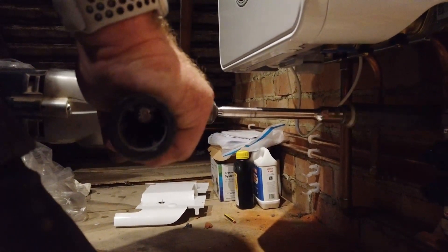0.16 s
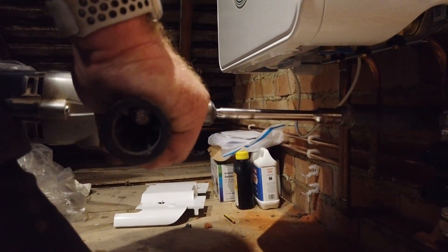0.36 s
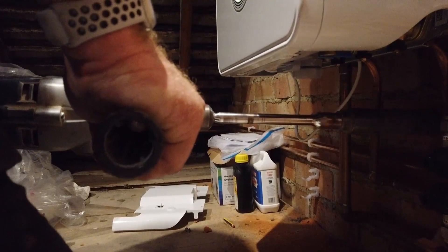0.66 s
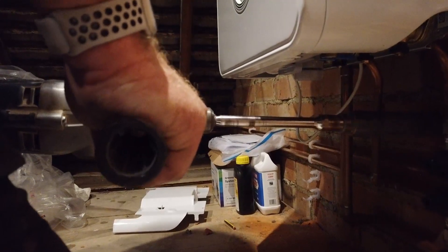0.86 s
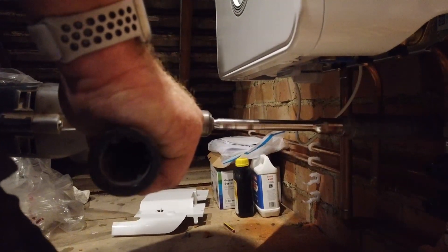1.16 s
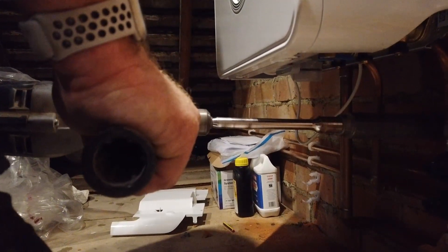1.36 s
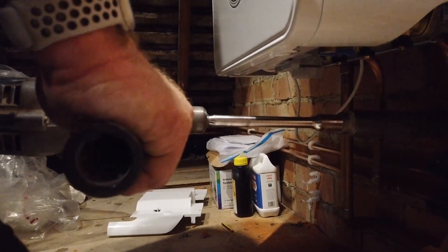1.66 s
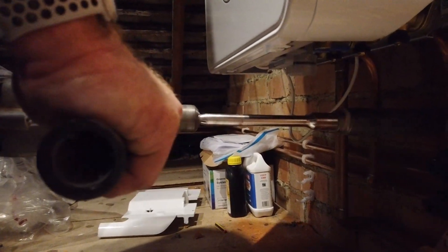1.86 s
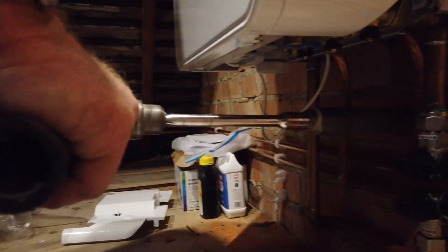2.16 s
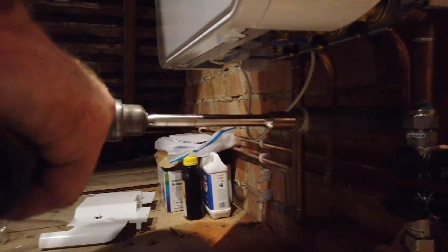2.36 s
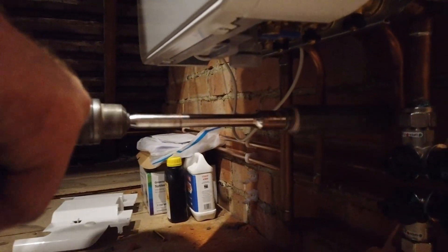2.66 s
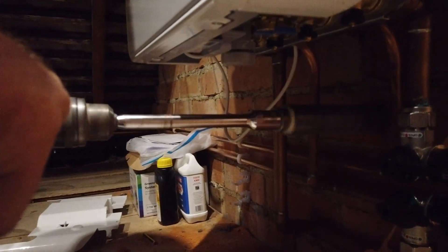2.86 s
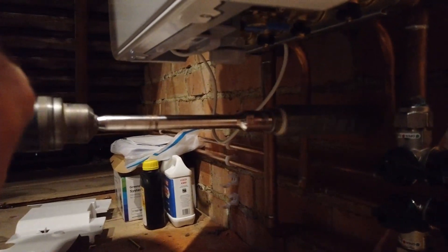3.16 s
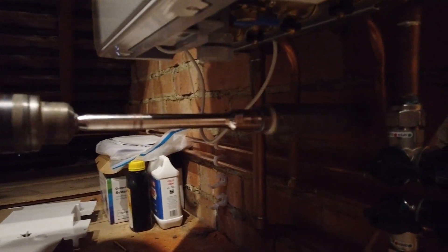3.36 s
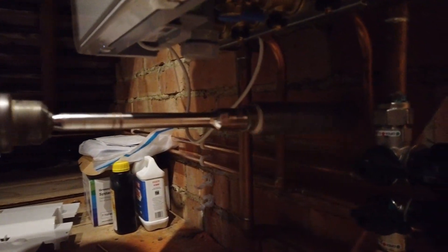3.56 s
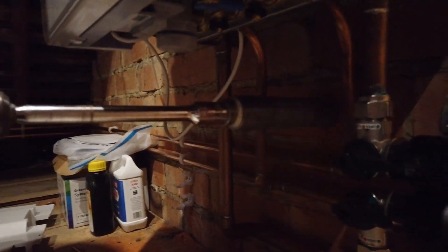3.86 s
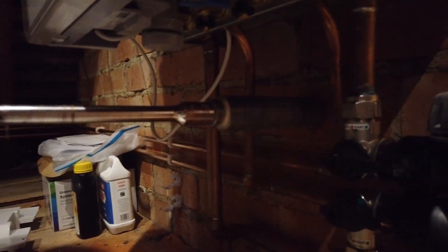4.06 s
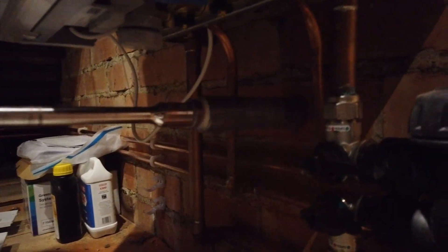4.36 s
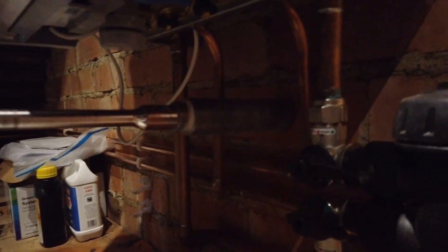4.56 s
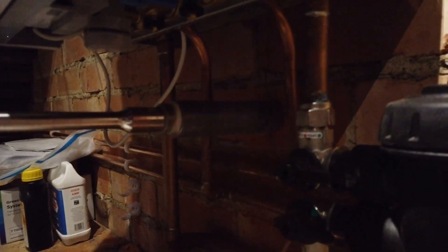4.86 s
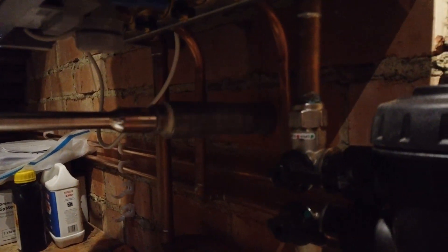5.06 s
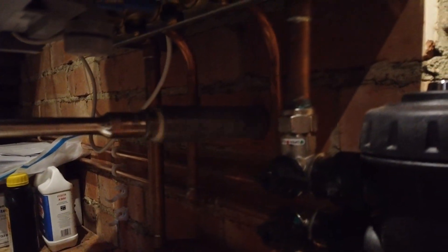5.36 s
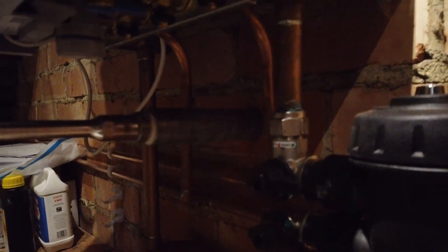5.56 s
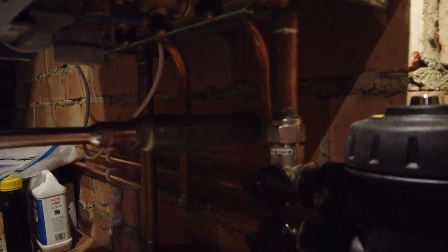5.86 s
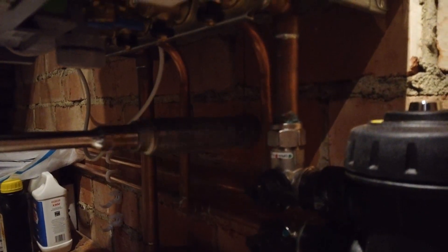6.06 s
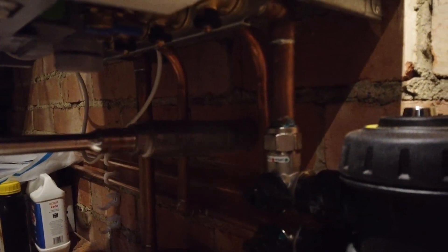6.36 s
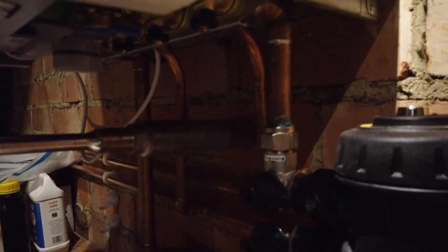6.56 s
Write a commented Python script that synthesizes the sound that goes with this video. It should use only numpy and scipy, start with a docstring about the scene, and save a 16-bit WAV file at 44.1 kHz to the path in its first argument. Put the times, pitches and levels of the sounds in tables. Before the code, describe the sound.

An electric drill starts up close by with a jolt, a short rattle of gears and a rising whine, reaching full speed at about 1 second. From then on the motor hums and whines over a high hiss of air. Throughout, its steel core bit grinds into brick with a gritty rasp. For the first 3 seconds it knocks dully and scrapes about ten times a second, with a few faint squeaks. Around 2.5 seconds a high metallic squeal creeps in, turning loud by 3 seconds and throbbing with each turn of the bit. The knocking fades and the motor sags slightly. The squeal stutters, with sharper chirps near 5 seconds, drops back from about 5.4 to 5.9 seconds as the motor recovers, then returns loudly until about 6.6 seconds, just before the end. The cramped loft adds only short, dull echoes.

```python
"""A rising whine and a rattle of gears: an electric drill runs up in a cramped loft.
Its steel core bit grinds into a brick wall, knocking and scraping in the hole once a turn,
over the hum of the rotor and a rush of cooling air. As it bites deeper, stick-slip friction
sets the tube squealing in throbs and the motor sags under the load."""
import sys
import numpy as np
from scipy import signal
from scipy.fft import rfft, irfft, next_fast_len
from scipy.io import wavfile

SR = 44100
rng = np.random.default_rng(int(sys.argv[2]) if len(sys.argv) > 2 else 0)


def wav_record(signal):
    """Record a signal, one row per channel, as 16-bit PCM in the file named by sys.argv[1]."""
    frames = np.transpose(np.atleast_2d(signal))
    bounded = np.clip(frames, -1, 1)
    # unit amplitude maps onto the largest positive 16-bit level
    quanta = np.round(bounded * 32767).astype(np.int16)
    wavfile.write(sys.argv[1], SR, quanta)


N = 295911
GEAR_RATIO = 40.4   # motor turns per bit turn


def from_db(db):
    """Decibels to gain."""
    return 10 ** (np.asarray(db) / 20)


def unit_rms(x):
    """Scale to rms 1."""
    return x / np.sqrt(np.mean(x ** 2) + 1e-20)


def clock():
    """Time of each sample, s."""
    return np.arange(N) / SR


def at_times(rows, times):
    """Each column of a curve at the given times."""
    knots_s, *columns = np.transpose(rows)
    return [np.interp(times, knots_s, column) for column in columns]


def in_time(rows):
    """Each column of a curve at every sample."""
    return at_times(rows, clock())


def at_hz(rows, hz):
    """Read a spectrum on a log-frequency axis."""
    knots_hz, values = np.transpose(rows)
    return np.interp(np.log(hz), np.log(knots_hz), values)


def phase_of(hz):
    """Running angle of a changing frequency, rad."""
    return 2 * np.pi * np.cumsum(hz) / SR


def once_a_turn(motor_hz, place):
    """Times at which the bit passes a given place in its turn."""
    turns = np.maximum.accumulate(np.cumsum(motor_hz / GEAR_RATIO) / SR - place)
    return np.interp(np.arange(np.ceil(turns[0]), turns[-1]), turns, clock())


def drift(rate_hz):
    """Low-passed random wander, rms 1."""
    hop, settle = 40, 2000
    pole = np.exp(-2 * np.pi * hop * rate_hz / SR)
    white = rng.standard_normal(N // hop + settle + 2)
    slow = signal.lfilter([1], [1, -2 * pole, pole * pole], white)[settle:]
    return np.interp(np.arange(N) / hop, np.arange(len(slow)), unit_rms(slow))


def resonate(x, hz, width_hz):
    """Two-pole resonance, peak gain 1."""
    radius = np.exp(-np.pi * width_hz / SR)
    feedback = [1, -2 * radius * np.cos(2 * np.pi * hz / SR), radius ** 2]
    return signal.lfilter(np.array([1, 0, -1]) * (1 - radius ** 2) / 2, feedback, x + 1e-18)


def spread(pair, correlation):
    """Mix two independent signals to left and right with a given correlation."""
    correlation = np.clip(correlation, -1, 1)
    return np.sqrt(1 + correlation) * pair[0] + np.sqrt(1 - correlation) * pair[1] * [[1], [-1]]


def tone(angle, waver_db, waver_hz, stray_rad):
    """A partial whose level wavers and whose phase strays between the ears; rms 1."""
    apart = stray_rad * drift(0.72) * np.array([[1], [-1]])
    return unit_rms(np.sin(angle + apart) * from_db(waver_db * drift(waver_hz)))


def grit_ring(hz, width_hz, correlation, grain_db=1.5, per_s=3000):
    """Brick grains of uneven size strike one resonance; rms 1."""
    strikes = rng.random((2, N)) < per_s / SR
    grains = strikes * rng.standard_normal((2, N)) * from_db(grain_db * drift(63))
    ringing = resonate(resonate(grains, hz, width_hz), hz, 5 * width_hz)
    return unit_rms(spread(ringing, correlation))


# stereo image of the noise: f/Hz, left-right correlation
NOISE_CORRELATION = [(30, 0.27), (70, 0.55), (170, 0.56), (350, 0.88), (600, 0.93), (1200, 1), (2200, 0.41),
                     (4000, 0.45), (8000, 0.48), (14000, 0.39)]


def banded_noise(spectrum, flicker_db, flicker_hz):
    """Half-octave bands of stereo noise, each flickering independently; rms 1."""
    out, edges_hz = 0, 20 * 2 ** np.arange(0, 10.1, .5)
    white = rng.standard_normal((2, 2, N))
    for k, (low, high) in enumerate(zip(edges_hz, edges_hz[1:])):
        hz, flicker = np.sqrt(low * high), drift(flicker_hz)
        if high > spectrum[0][0] and low < spectrum[-1][0]:
            bandpass = signal.butter(2, [low, high], "band", fs=SR, output="sos")
            band = spread(signal.sosfilt(bandpass, white[k % 2]), at_hz(NOISE_CORRELATION, hz))
            out = out + from_db(at_hz(spectrum, hz) + flicker_db * flicker) * band
    return unit_rms(out)


def loft_echoes(x, count=14, t60_s=0.2):
    """Dull early echoes from wall, boiler casing and roof, different at each ear."""
    out = np.zeros((2, N))
    dull = signal.sosfilt(signal.butter(2, [400, 6000], "band", fs=SR, output="sos"), x)
    for ear in range(2):
        for delay_s, sign in zip(rng.uniform(.004, .07, count), rng.choice([-1, 1], count)):
            lag = int(delay_s * SR)
            out[ear, lag:] += sign * from_db(-60 * delay_s / t60_s) * dull[ear, :N - lag]
    return out / np.sqrt(count)


# airflow: t/s, level/dB
AIR_DB = [(0, -52), (.45, -43), (1.3, -39.5), (3.1, -39), (3.8, -40), (4.6, -40), (5.65, -36.5), (6.3, -43)]
# air spectrum: f/Hz, density/dB
AIR_SPECTRUM = [(3000, -11.5), (8000, -2), (12000, 6), (14000, -3), (16000, -2)]


def cooling_air():
    """Cooling air rushes through the drill as a high hiss."""
    air_db, = in_time(AIR_DB)
    gain = from_db(air_db + 4.5 + 0.43 * drift(6))
    return gain * banded_noise(AIR_SPECTRUM, flicker_db=1.5, flicker_hz=15)


# vibration: t/s, drill shake/dB, wall boom/dB
VIBRATION_DB = [(0, -49, -39), (.4, -53.5, -46), (2.0, -53, -44.5), (2.9, -50, -52), (3.4, -54.5, -53),
                (4.4, -56, -60), (4.75, -44.5, -58), (5.0, -55, -54), (5.7, -64, -53.5), (6.35, -51, -66),
                (6.71, -65, -57)]
# shake spectrum: f/Hz, density/dB
SHAKE_SPECTRUM = [(22, 0.5), (60, -2), (100, -5), (160, -9.5), (300, -17.5)]


def vibration():
    """The drill body shakes and the wall booms at one low mode."""
    shake_db, boom_db = in_time(VIBRATION_DB)
    shake_gain = from_db(shake_db + 4.8 * drift(9.9))
    shake = shake_gain * banded_noise(SHAKE_SPECTRUM, flicker_db=0, flicker_hz=12)
    boom = from_db(boom_db - 1) * grit_ring(hz=173.5, width_hz=38, correlation=1)
    return shake + boom


def gear_case(motor_hz):
    """Pinion overtones sweep through a resonance of the gear case during the run-up."""
    angle = phase_of(motor_hz)
    mesh = sum(tone(order * angle + drift(40), waver_db=2, waver_hz=30, stray_rad=.5)
               for order in (12, 18))
    return from_db(-46) * resonate(mesh, hz=4670, width_hz=110)


# rotor hum: t/s, level/dB
HUM_DB = [(0.6, -44.5), (0.9, -39.5), (2.7, -39.5), (3.9, -44.5), (4.7, -45.5), (5.4, -42.5), (6.35, -47),
          (6.7, -43)]


def rotor_hum(motor_hz, angle, throb_db=2.5, full_load_sag_hz=21):
    """Rotor unbalance hums near full speed; under load the bit rocks the drill once a turn."""
    hum_db, = in_time(HUM_DB)
    top_hz = np.max(motor_hz)
    spun_up = np.minimum(motor_hz / top_hz / .89, 1) ** 17
    load = np.minimum((top_hz - motor_hz) / full_load_sag_hz, 1)
    gain = from_db(hum_db + throb_db * load * np.sin(angle / GEAR_RATIO)) * spun_up
    return gain * tone(angle, waver_db=1.2, waver_hz=12, stray_rad=.15)


# armature and pinion tones: multiple of motor speed, level/dB
MOTOR_ORDERS = [(1.32, -56), (2, -55.5), (2.66, -58), (4, -56), (5.85, -47), (6, -55), (6.15, -49),
                (7, -61), (12, -59), (18.2, -59)]
# run-up and settling: t/s, gear rattle/dB, brush chatter/dB, gain on MOTOR_ORDERS/dB
RUN_UP_DB = [(0, -39, -62, -20), (.07, -30.5, -57, -22), (.17, -31.5, -42, -20), (.22, -41, -41, -18),
             (.33, -46, -41, -18), (.4, -35.5, -40, -6), (.53, -36.5, -51, -5), (.6, -52, -50, -8),
             (.9, -70, -55, 0), (1.3, -75, -65, 3.5), (6.71, -75, -65, 2)]
# high whines: t/s, commutator/dB, bearing/dB
WHINES_DB = [(.3, -70, -70), (1.2, -50, -47), (1.7, -53, -51), (2.7, -50, -56), (3.6, -57, -57),
             (4.2, -48, -54), (4.9, -55, -50), (5.25, -55, -46), (5.45, -47, -49), (5.9, -46, -53),
             (6.1, -53, -55)]


def motor(motor_hz, pinion_teeth=6, commutator_bars=35):
    """Rotor, gears, brushes and bearing sound at multiples of the shaft speed."""
    angle = phase_of(motor_hz * (1 + .0004 * drift(12)))
    rattle_db, chatter_db, whine_db = in_time(RUN_UP_DB)
    whistle_db, bearing_db = in_time(WHINES_DB)
    hum = rotor_hum(motor_hz, angle)
    whine = sum(from_db(db) * tone(order * angle, waver_db=2.5, waver_hz=11.5, stray_rad=.79)
                for order, db in MOTOR_ORDERS)
    # the teeth rattle while they accelerate the bit
    rattle = tone(pinion_teeth * angle + .9 * drift(60), waver_db=2.5, waver_hz=70, stray_rad=.3)
    # the brushes skip during the run-up, then whistle
    chatter = tone(commutator_bars * angle + drift(70), waver_db=1.5, waver_hz=50, stray_rad=.6)
    whistle = tone(commutator_bars * angle, waver_db=3, waver_hz=6, stray_rad=.6)
    # slipping balls: non-integer order, wandering phase
    bearing = tone(19.5 * angle + 1.1 * drift(20), waver_db=2.5, waver_hz=20, stray_rad=.5)
    gears = from_db(whine_db) * whine + from_db(rattle_db) * rattle
    brushes = from_db(chatter_db) * chatter + from_db(whistle_db) * whistle
    return hum + gears + brushes + from_db(bearing_db) * bearing


# teeth on brick: t/s, level/dB
GRIND_DB = [(0, -36.5), (.18, -40), (2.4, -39.5), (3.2, -38.5), (4.4, -38), (4.75, -36.5), (5.7, -39.3),
            (6.3, -35.5)]
# fine grit in the slot: t/s, hiss/dB, sizzle/dB
GRIT_DB = [(0, -35.5, -42), (.3, -40, -40), (1.6, -38.5, -39.5), (2.9, -37.5, -35.5), (4.4, -38, -39.5),
           (4.8, -36.5, -40.5), (5.7, -36, -38.5), (6.6, -38, -39)]
# grind and hiss spectra: f/Hz, density/dB
GRIND_SPECTRUM = [(120, -12), (230, -8), (330, -9), (520, -3), (720, -4.5), (1100, 0.5), (1600, 2.5),
                  (2200, -13.5), (2800, -5.5), (4000, -5), (5200, -9), (8000, -15.5)]
HISS_SPECTRUM = [(2500, 1.5), (4300, -1.5), (6000, -3.5), (7800, 1), (9000, -1), (10500, -19), (12500, -7),
                 (16000, -32)]
# tube modes under the grit: f/Hz, width/Hz, level/dB
TUBE_RING_MODES = [(1715, 78, -10.5), (2070, 126, -2.5), (2119.5, 13.7, -0.5)]
TUBE_SIZZLE_MODES = [(10630, 590, 1), (11160, 520, -4)]


def cutting(motor_hz, swing):
    """Teeth grind the brick, pulsing slightly with each turn, and grit rings the tube."""
    grind_db, = in_time(GRIND_DB)
    hiss_db, sizzle_db = in_time(GRIT_DB)
    bit_angle = phase_of(motor_hz / GEAR_RATIO)
    bite = .5 * np.sin(bit_angle) + .16 * np.sin(2 * bit_angle + drift(1.7)) + .77 * drift(31)
    # on a widely swinging tube the teeth skate and cut less
    skating_db = 0.65 * np.abs(swing) / np.max(np.abs(swing))
    grind = banded_noise(GRIND_SPECTRUM, flicker_db=1.75, flicker_hz=22)
    hiss = banded_noise(HISS_SPECTRUM, flicker_db=1.86, flicker_hz=42)
    ring = sum(from_db(db) * grit_ring(hz, width_hz, correlation=.19)
               for hz, width_hz, db in TUBE_RING_MODES)
    sizzle = sum(from_db(db) * grit_ring(hz, width_hz, correlation=.3, per_s=12000)
                 for hz, width_hz, db in TUBE_SIZZLE_MODES)
    return (from_db(grind_db + 2 + .33 * bite - skating_db) * grind
            + from_db(hiss_db + 4 + .44 * bite) * hiss
            + from_db(grind_db + .5) * ring
            + from_db(sizzle_db + .24 * bite) * sizzle)


# bit against the side of its hole: t/s, thump/dB, scrape/dB, place/turn
KNOCK_CURVE = [(.05, -21, -33, 0.38), (.2, -29, -43, 0.31), (.7, -30.5, -47, 0.46), (1.0, -23, -35, 0.36),
               (1.7, -27.5, -35.5, 0.37), (1.95, -19, -28, 0.38), (2.1, -28.5, -34, 0.35),
               (2.6, -24.5, -28.5, 0.39), (3.0, -28.5, -32.5, 0.39), (3.25, -44, -26.5, 0.43),
               (3.6, -42, -24, .40), (3.85, -46, -33, 0.33), (4.9, -56, -45, 0.12), (5.05, -37, -32, 0.07),
               (5.7, -38, -50, 0.21), (5.9, -50, -45, 0.2)]


def knock_events(motor_hz, scatter_db=1.0):
    """A jolt as the gears take up slack, then one knock a turn: t/s, thump/dB, scrape/dB."""
    jolt = (0.089, -25.5, -36)
    times = once_a_turn(motor_hz, place=in_time(KNOCK_CURVE)[2])
    thump_db, scrape_db, _ = at_times(KNOCK_CURVE, times)
    uneven_db = scatter_db * rng.standard_normal(len(times))
    return [jolt, *zip(times, thump_db + uneven_db, scrape_db + 2 * uneven_db)]


# struck wall: f/Hz, width/Hz, gain/dB
WALL_THUD_MODES = [(101, 81, 3.5), (173.8, 33.7, 9.5)]
# tooth scrape spectrum: f/Hz, density/dB
SCRAPE_SPECTRUM = [(250, -18), (550, -0.5), (1200, -8), (1900, 4.5), (2600, -8), (5000, -16),
                   (12000, -24.5)]


def knocks(motor_hz, contact_s=0.0025, scrape_s=0.0076):
    """Each knock is a soft blow that thuds through the wall, with a short scrape of the teeth."""
    blows, rub = np.zeros((2, N))
    t, events = clock(), knock_events(motor_hz)
    for (start_s, thump_db, scrape_db), (lateness, force) in zip(events, rng.random((len(events), 2))):
        near = slice(int(start_s * SR), int(start_s * SR) + SR // 10)
        age_s = np.maximum(t[near] - start_s, 0)
        second_tooth = (0.00473 + 0.002 * lateness, .5 + .63 * force)
        for delay_s, share in ((0, 1), second_tooth):
            push = np.clip((age_s - delay_s) / contact_s, 0, 1)
            blows[near] += from_db(thump_db) * share * np.sin(np.pi * push) ** 2
        rub[near] += from_db(scrape_db) * age_s / scrape_s * np.exp(1 - age_s / scrape_s)
    modes = sum(from_db(db) * resonate(blows, hz, width_hz) for hz, width_hz, db in WALL_THUD_MODES)
    thud = resonate(modes, hz=118, width_hz=130)
    scrape = from_db(-3.5) * banded_noise(SCRAPE_SPECTRUM, flicker_db=1, flicker_hz=63)
    ring = from_db(-5) * grit_ring(hz=1980, width_hz=95, correlation=1)
    ring += from_db(-8) * grit_ring(hz=3145, width_hz=114, correlation=.41)
    wall = from_db(-17.5) * grit_ring(hz=245, width_hz=38, correlation=.95)
    return thud + rub * (scrape + ring + wall)


# continuous light rubbing: t/s, level/dB
LIGHT_RUB_DB = [(0, -35.5), (.5, -38.5), (1.6, -40.5), (2.8, -45.5), (3.6, -45), (4.2, -41.5), (5.6, -43.5),
                (6.3, -44)]
# single hard rubs: t/s, peak/dB
HARD_RUB_PEAKS = [(.11, -32), (.28, -37), (2.17, -36), (2.56, -28.5), (4.73, -26), (4.84, -31),
                  (4.932, -24.5), (5.03, -32), (5.125, -27), (5.23, -26), (6.39, -35), (6.56, -30)]


def upper_mode(swing, hz=3151, sing_threshold_db=-35, hard_rub_s=0.011):
    """The tube's upper mode rattles under light rubbing and sings when rubbed hard."""
    hard = sum(from_db(db) * np.exp(-((clock() - s) / hard_rub_s) ** 2) for s, db in HARD_RUB_PEAKS)
    light = from_db(in_time(LIGHT_RUB_DB)[0] + 2.5 * drift(20))
    catch_rub = from_db(-27 + 2.9 * drift(30)) * np.abs(swing)
    rub = np.hypot(light, hard + catch_rub)
    singing = .9 / (1 + (from_db(sing_threshold_db) / rub) ** 3)
    note = tone(phase_of(hz + 25 * drift(29)), waver_db=.5, waver_hz=34, stray_rad=.96)
    rattle = grit_ring(hz, width_hz=72, correlation=.23, grain_db=2.5)
    return rub * (np.sqrt(singing) * note + np.sqrt(1 - singing) * rattle)


# friction on the tube: t/s, catch peak/dB, binding/0-1
FRICTION_CURVE = [(0, -44, 0), (2.1, -43, 0), (2.4, -33, 0.1), (2.53, -26.5, 0.6), (2.68, -25.5, 0.4),
                  (2.8, -28.5, 0), (2.92, -16.5, 0.1), (3.02, -22.5, 0), (3.21, -12.5, 0.36),
                  (3.31, -18, 0), (3.48, -10.5, 0.13), (3.82, -12.5, 0.23), (4.1, -11, 0.46),
                  (4.5, -12.5, 0.3), (4.65, -11, 1), (4.82, -12.5, 0.84), (5.03, -9.5, 0.23),
                  (5.22, -13, 0.14), (5.4, -29, 0.65), (5.8, -24.5, 0.5), (6.0, -12.5, 0.5),
                  (6.1, -12, 0.82), (6.5, -12, 1), (6.6, -10, 0), (6.71, -30, 0.3)]
# lone squeaks as the bit brushes the hole: t/s, peak/dB
SQUEAK_PEAKS = [(0.033, -27), (0.518, -32), (0.839, -40), (0.971, -31.5), (2.25, -29.5), (2.476, -26.5)]


def catches(motor_hz, free_turn=.98, early_turn=.19, late_turn=.1, scatter_db=1.3):
    """Friction catches once a turn, earlier and twice when binding, plus squeaks: t/s, peak gain."""
    binding = np.clip(in_time(FRICTION_CURVE)[1], 0, 1)
    first_s = once_a_turn(motor_hz, free_turn - early_turn * binding)
    second_s = once_a_turn(motor_hz, free_turn + late_turn)
    times = np.r_[first_s, second_s]
    share = np.r_[np.ones(len(first_s)), np.interp(second_s, clock(), binding)]
    peak_db = at_times(FRICTION_CURVE, times)[0] + scatter_db * np.interp(times, clock(), drift(14))
    squeaks = [(s, from_db(db)) for s, db in SQUEAK_PEAKS]
    return [*zip(times, from_db(peak_db) * share), *squeaks]


# the squeal stalls and restarts: t/s
STALL_TIMES_S = [3.919, 4.215, 4.729, 4.92, 6.3922, 6.56]
STALL_S, SURGE_S, SURGE_DB = 0.014, 0.028, 4.5


def tube_swing(motor_hz, limit, rise_s=0.017, hold_s=0.0035, fade_db_per_s=177):
    """Signed amplitude of a tube mode pumped by stick-slip: it swells at each catch and rings away."""
    t, power = clock(), np.zeros(N)
    for catch_s, peak in catches(motor_hz):
        near = slice(max(int(catch_s * SR) - SR // 10, 0), int(catch_s * SR) + SR // 2)
        age_s = t[near] - catch_s
        rise = np.exp(-(np.minimum(age_s, 0) / rise_s) ** 2)
        fallen_db = fade_db_per_s * (np.hypot(np.maximum(age_s, 0), hold_s) - hold_s)
        power[near] += (peak * from_db(-fallen_db)) ** 2 * rise
    # at a stall friction opposes the swing: it surges, crosses zero and builds up reversed
    stall = np.prod([np.tanh((t - s) / STALL_S) for s in STALL_TIMES_S], axis=0)
    surge_db = SURGE_DB * sum(np.exp(-((t - s) / SURGE_S) ** 2) for s in STALL_TIMES_S)
    _, binding = in_time(FRICTION_CURVE)
    flutter_db = 0.6 * (.5 + binding) * drift(47)
    swing = np.sqrt(power) * stall * np.abs(stall) * from_db(surge_db + flutter_db)
    # slipping limits the widest swings
    return swing / (1 + (np.abs(swing) / limit) ** 8) ** (1 / 8)


# squeal overtones: multiple, level/dB
SQUEAL_OVERTONES = [(2, -24), (3, -28), (4, -30.5), (5, -24.5)]
# octave boost; higher overtones move the opposite way: t/s, gain/dB
OCTAVE_BOOST_DB = [(3.4, 5), (4.15, 5), (4.45, -3), (6.3, -2)]


def squeal(swing, limit, hz=2141.5):
    """The swinging tube radiates a nearly pure note; hard slip at wide swings adds overtones."""
    angle = phase_of(hz + 2.5 * drift(14))
    out = swing * tone(angle, waver_db=.15, waver_hz=50, stray_rad=.18)
    slip = np.abs(swing) ** 2.5 / limit ** 1.5
    octave_db, = in_time(OCTAVE_BOOST_DB)
    for multiple, db in SQUEAL_OVERTONES:
        colour_db = octave_db if multiple == 2 else -0.46 * octave_db
        overtone = tone(multiple * angle + .4 * drift(40), waver_db=1.8, waver_hz=45, stray_rad=.6)
        out += from_db(db + 1 + colour_db) * slip * overtone
    return out


# shaft speed, running up and sagging under load: t/s, f/Hz
MOTOR_SPEED_HZ = [(0, 205), (.1, 262), (.2, 295), (.35, 333), (.55, 365), (.75, 397.3), (.95, 409),
                  (1.3, 414.5), (2.1, 409.7), (2.7, 410.6), (3.6, 400.2), (4.5, 397.8), (4.85, 398.5),
                  (5.4, 413.2), (5.7, 416.6), (6.1, 413.1), (6.5, 404.6), (6.71, 403)]


def scene():
    """Drill and bit close by; the loft echoes the cutting, rubbing and knocking."""
    motor_hz, = in_time(MOTOR_SPEED_HZ)
    swing_limit = from_db(-8)
    swing = tube_swing(motor_hz, swing_limit)
    background = cooling_air() + vibration()
    work = cutting(motor_hz, swing) + upper_mode(swing) + knocks(motor_hz)
    drill = motor(motor_hz) + gear_case(motor_hz)
    return background + drill + work + squeal(swing, swing_limit) + from_db(-5) * loft_echoes(work)


# stereo width: f/Hz, side gain/dB
SIDE_GAIN_DB = [(1900, 0), (2140, 0), (2450, 5), (2900, 4), (3200, -2), (3900, -3), (4350, 3), (5000, 3),
                (6000, -3), (8000, 4), (9300, -5), (10900, 3), (12800, -4), (14400, 4), (15300, -3)]
CUTOFF_HZ = 15850


def record(dry):
    """Widen some bands, narrow others, and cut the top steeply."""
    mid, side = (dry[0] + dry[1]) / 2, (dry[0] - dry[1]) / 2
    size = next_fast_len(N + SR // 10)
    hz = np.maximum(np.arange(size // 2 + 1) * SR / size, 1)
    side = irfft(rfft(side, size) * from_db(at_hz(SIDE_GAIN_DB, hz)), size)[:N]
    lowpass = signal.ellip(12, .2, 90, CUTOFF_HZ, fs=SR, output="sos")
    return signal.sosfilt(lowpass, [mid + side, mid - side])


dry = scene()
out = record(dry)
wav_record(out)
```